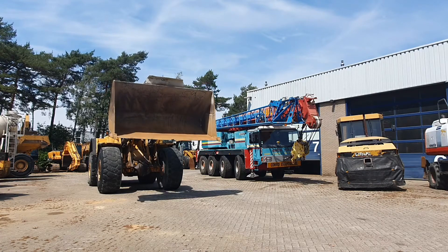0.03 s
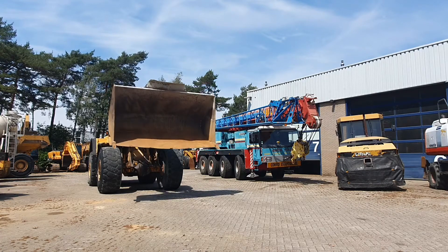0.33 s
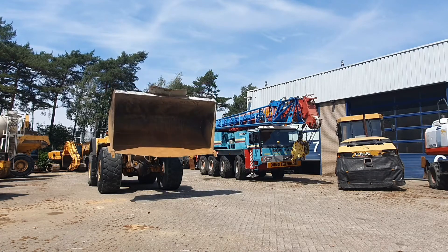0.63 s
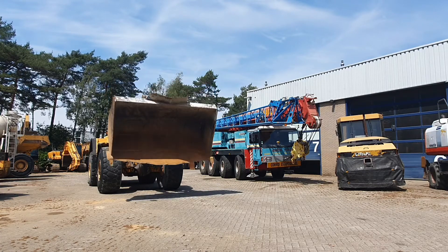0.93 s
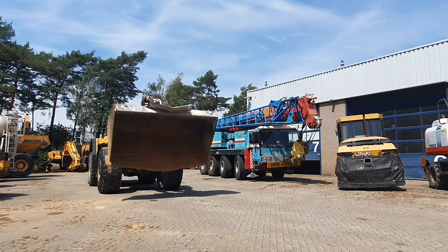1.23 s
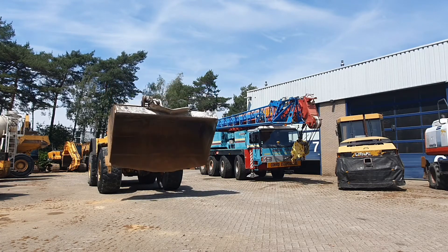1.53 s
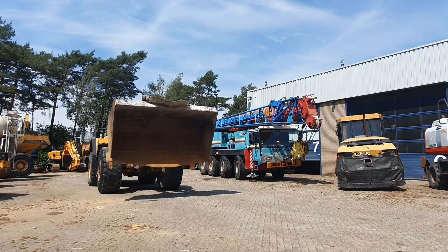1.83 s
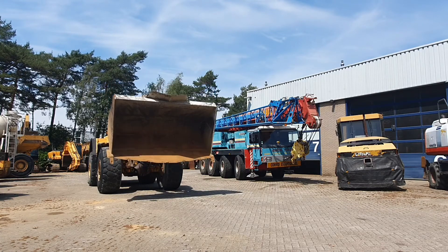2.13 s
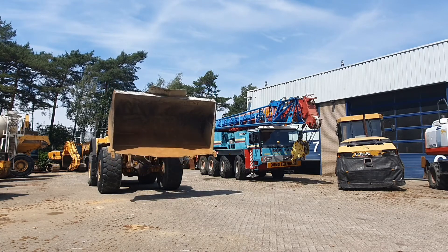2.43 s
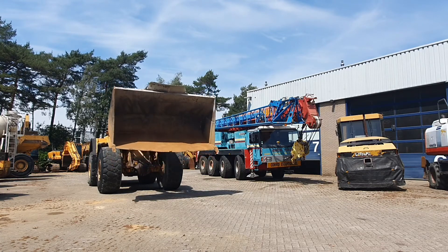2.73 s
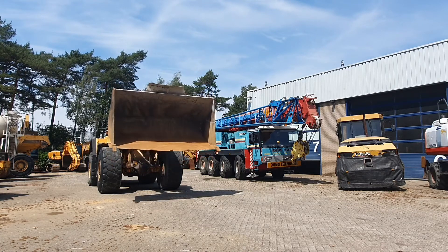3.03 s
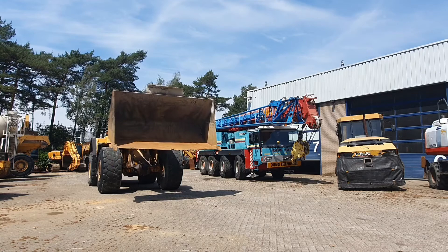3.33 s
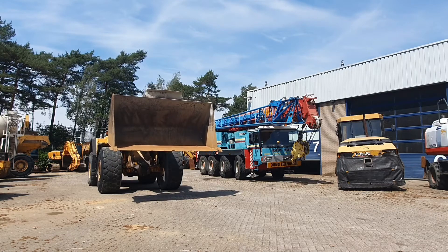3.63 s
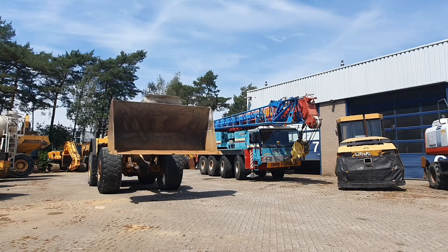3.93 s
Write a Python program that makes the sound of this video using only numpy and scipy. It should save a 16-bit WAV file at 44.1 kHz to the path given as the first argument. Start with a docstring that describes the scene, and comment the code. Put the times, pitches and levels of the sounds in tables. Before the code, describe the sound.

A wheel loader works its bucket outdoors over its droning diesel, a little left of the microphone. A soft hiss ends in three main steel clanks and low thuds, followed by a rasping whine and brighter hiss during the lift.

```python
"""A wheel loader works its bucket

A diesel idles in a paved yard, a little to the left: its firings give a harmonic drone and a clatter.
Turbulent oil hisses in the valve as the bucket sinks. The arms stop short; three main impacts on the
pins, among lighter ones, ring the bucket's plates, and the machine booms as it rocks. Then the pump
whines and rasps under load, and the valve hisses more brightly as the bucket rises again."""
import sys
import numpy as np
from scipy import signal
from scipy.fft import rfft, irfft, next_fast_len
from scipy.io import wavfile
from scipy.ndimage import uniform_filter1d, minimum_filter1d, map_coordinates

SR = 44100
rng = np.random.default_rng(int(sys.argv[2]) if len(sys.argv) > 2 else 0)


def waveform_to_disk(signal):
    """Save audio, clipped to [-1, 1], as 16-bit WAV at the path in sys.argv[1]."""
    frames = np.transpose(np.atleast_2d(signal))
    scaled = np.clip(frames, -1, 1) * 32767
    samples = np.round(scaled).astype(np.int16)
    wavfile.write(sys.argv[1], SR, samples)


N = 176400

# Engine speed. Each row: time in seconds, firing rate in Hz.
FIRING_RATE = [(0, 56.03), (.5, 56.02), (1.25, 55.44), (1.6, 56.4), (1.95, 55.83), (2.3, 55.14),
               (2.65, 55.1), (2.93, 55.7), (3.3, 55.37), (3.6, 55.7), (4, 55.75)]
# Line spectra of exhaust and pump. Each row: multiple of the firing rate, relative level in dB.
EXHAUST_PARTIALS = [(.5, -28.5), (1, 0), (1.5, -33), (2, -8.5), (3, -21.5), (4, -22.5), (5, -35),
                    (6, -22.5)]
PUMP_PARTIALS = [(9, -0.5), (10, -15), (12, -14.5)]
# Envelopes of the sustained sounds. Each row: time in seconds, level in dB.
DRONE_LEVEL = [(0, -22.5), (.8, -21.5), (1.45, -19), (1.75, -24), (1.98, -30), (2.38, -25), (2.5, -28),
               (2.62, -24), (2.71, -31), (2.82, -22.5), (2.93, -26), (3.1, -22.5), (3.32, -24),
               (3.46, -27.5), (3.56, -21.5), (3.7, -26), (3.85, -22), (4, -25)]
CLATTER_LEVEL = [(0, -32), (1.4, -32), (1.8, -34.5), (2.35, -37.5), (2.7, -37.5), (3, -36.5), (4, -35)]
RUMBLE_LEVEL = [(0, -27.5), (1.35, -33.5), (2.1, -27), (2.4, -29), (2.8, -29.5), (4, -31)]
WHINE_LEVEL = [(0, -44.5), (.6, -40.5), (1.0, -42.5), (1.25, -35), (1.42, -46), (1.9, -34), (2.3, -41),
               (2.5, -37), (3.1, -37.5), (3.4, -44.5), (4, -40)]
LOWERING_LEVEL = [(0, -42), (.3, -40.5), (1.34, -44), (1.40, -38), (1.455, -38.5), (1.51, -46.5),
                  (1.65, -94)]
WHISTLE_LEVEL = [(1.3, -73), (1.44, -50), (1.52, -79), (2.65, -85), (2.78, -49), (3.1, -43), (3.45, -40.5),
                 (4, -43.5)]
SHUDDER_LEVEL = [(1.35, -37.5), (1.5, -30.5), (1.68, -23.5), (1.8, -22.5), (1.95, -24.5), (2.1, -24),
                 (2.25, -27.5), (2.45, -44)]
LIFTING_LEVEL = [(2.6, -88), (2.71, -55.5), (2.77, -48), (2.95, -43.5), (3.35, -41), (3.7, -40.5), (4, -38)]
RASP_LEVEL = [(2.6, -96), (2.8, -45), (2.9, -38.5), (3.36, -38), (3.44, -35.5), (3.56, -35), (3.65, -40),
              (4, -37.5)]
# Continuous spectra of the noises. Each row: frequency in Hz, relative level in dB.
CLATTER_SPECTRUM = [(150, -20), (250, -1.5), (330, -4), (380, -8), (435, 0.5), (475, -6), (560, -7.5),
                    (660, -6), (790, -9), (930, -9.5), (1300, -9.5), (2100, -12.5), (2800, -21),
                    (4500, -26), (7500, -37), (8700, -49), (15000, -47)]
RUMBLE_SPECTRUM = [(15, -13), (30, 4), (42, 12.5), (70, 17.5), (90, 4.5), (125, 6.5), (180, 4.5),
                   (280, -11), (450, -37.5)]
LOWERING_SPECTRUM = [(800, 8.5), (2000, 6.5), (3000, -0.5), (4800, 3), (5800, 5.5), (6600, -3), (7600, -3),
                     (8600, -14), (12000, -9.5), (15500, -16)]
SHUDDER_SPECTRUM = [(35, -29), (55, -2.5), (72, 4), (90, -9), (108, 2.5), (135, 9), (160, -6.5), (250, -10),
                    (350, -47)]
RATTLE_SPECTRUM = [(150, -41.5), (350, -8.5), (530, -3.5), (800, -11.5), (1200, -2.5), (1650, -3),
                   (2200, -9.5), (2850, -9.5), (3500, -26), (5500, -33.5), (7500, -49), (9500, -68.5),
                   (15000, -69.5)]
LIFTING_SPECTRUM = [(1500, -7), (2800, -5.5), (4300, -5), (5900, -2), (7000, -6.5), (7600, -4), (8600, -16),
                    (11000, -11), (15500, -17.5)]
# Resonances of the valve and its pipes. Each row: centre in Hz, width in Hz, relative level in dB.
VALVE_RESONANCES = [(4820, 120, -12), (5620, 115, 0), (5890, 200, -7), (6180, 100, -9), (6620, 150, -9)]
# Impacts on the pins. Each row: start in seconds, level in dB, rattle's 60 dB decay time in seconds,
# rattle's tilt in dB per octave, frequency the contact favours in Hz.
IMPACTS = [(1.512, -27, .14, -5, 1500), (1.545, -29, .14, -10, 1100), (1.604, -12.5, .14, 0, 1650),
           (1.610, -10, .16, -1, 1300), (1.700, -26, .2, -8, 1150), (1.733, -24.5, .17, -7, 1150),
           (1.819, -26, .2, -7, 1100), (1.835, -17.5, .28, -2, 1050), (2.053, -16.5, .3, 1.5, 1550),
           (2.092, -24, .25, -8, 1200)]
# Plate modes. Each row: frequency in Hz, relative level in dB, free 60 dB decay time in seconds.
BUCKET_MODES = [(415, -14, 1.8), (460, -9, .3), (508, -9, .4), (589, -1, .38), (704, -11, .6),
                (1110, -4, .4), (1218, -1, .25), (1422, -2, .32), (1503, 0, .16), (1587, -2, .22),
                (1650, -2, .15), (1722, -4, .2), (1775, -3, .22), (1914, -4, .24), (2480, -10, .28),
                (2730, -8, .22), (2900, -10, .3)]
# Jolts of the machine. Each row: peak time in seconds, level in dB, pitch in Hz, swell time in seconds.
JOLTS = [(1.554, -10.5, 64, 0.013), (1.656, -10, 71.4, 0.049), (1.866, -9, 62.5, 0.039),
         (2.107, -10.5, 67, 0.018), (2.188, -20.5, 60, 0.046), (2.33, -16.5, 63.24, 0.015)]
# Resonance of the loaded pump. Each row: time in seconds, centre in Hz.
RASP_CENTRE = [(2.85, 1808), (3.15, 1900), (3.45, 1860), (3.56, 1677), (3.7, 1843)]
# Likeness of the two channels of noise. Each row: frequency in Hz, correlation coefficient.
COHERENCE = [(50, 0.99), (250, 0.97), (600, 0.73), (1500, 0.28), (4000, 0.37), (8000, 0.45), (15000, 0.22)]
# Position of the drone. Each row: time in seconds, left minus right level in dB.
DRONE_BALANCE = [(0, 0), (2.5, 0), (2.9, -1.8), (3.3, -2.8), (3.65, .4)]
# Position of the whole machine. Each row: frequency in Hz, left minus right level in dB.
MACHINE_BALANCE = [(60, -0.5), (300, -0.5), (1000, 0), (2200, 1.5), (4500, 0.5), (8000, 3), (15000, -2.5)]
# Reverberation of the yard. Each row: frequency in Hz, 60 dB decay time in seconds.
YARD_DECAY = [(200, 1), (1500, 0.2), (4000, 0.2), (10000, 0.13)]

TIME = np.arange(N) / SR
SIDES = np.array([[.5], [-.5]])  # splits a difference between left and right


def amp(db):
    """Amplitude ratio of a level in decibels."""
    return 10 ** (np.asarray(db) / 20)


def unit(x):
    """Normalisation to rms 1."""
    return x / np.sqrt(np.mean(x ** 2) + 1e-20)


def along(points, hz):
    """Interpolation of (Hz, value) points on a logarithmic frequency axis."""
    f, v = np.transpose(points)
    return np.interp(np.log(hz + 1), np.log(f + 1), v)


def curve(rows):
    """Linear interpolation of (seconds, value) rows at every sample."""
    return np.interp(TIME, *np.transpose(rows))


def wobble(rate):
    """Smooth random fluctuation: a spline through `rate` knots a second."""
    coarse = np.arange(0, N + 64, 64)
    spline = map_coordinates(rng.standard_normal(512), [coarse * rate / SR], mode="wrap")
    return np.interp(np.arange(N), coarse, spline)


def filtered(x, response):
    """Linear filtering: the spectrum is multiplied by a frequency response."""
    size = next_fast_len(N + SR // 2)
    return irfft(rfft(x, size) * response(np.fft.rfftfreq(size, 1 / SR)), size)[..., :N]


def noise(spectrum, tilt_db=0):
    """Partly coherent stereo noise of rms 1, nearly mono in the bass."""
    def response(hz):
        spread = np.arccos(np.clip(along(COHERENCE, hz), -1, 1)) / 2
        db = along(spectrum, hz) + tilt_db * np.log2(np.maximum(hz / 1000, .5))
        rolloff = np.maximum(hz / spectrum[-1][0], 1) ** 5
        return amp(db) / rolloff * [np.cos(spread), np.sin(spread)]
    mid, side = filtered(rng.standard_normal((2, N)), response)
    return unit(np.array([mid + side, mid - side]))


def tones(phase, partials, waver_db, rate):
    """Fourier synthesis: partials locked to the firing phase, each wavering in level."""
    return -np.sqrt(2) * sum(amp(db + waver_db * wobble(rate)) * np.cos(k * phase) for k, db in partials)


def exhaust_drone(phase):
    """Periodic firing pulses give a line spectrum on the firing rate."""
    level_db = curve(DRONE_LEVEL) + curve(DRONE_BALANCE) * SIDES
    return amp(level_db) * tones(phase, EXHAUST_PARTIALS, waver_db=-.1, rate=49)


def engine_knock(phase):
    """Valves and injectors tick alike in each cycle of four firings; the long period gives close lines."""
    cycle = rng.standard_normal(3000)
    position = phase / (8 * np.pi) % 1 * len(cycle)
    ticks = map_coordinates(cycle, [position], order=1, mode="wrap")
    return unit(filtered(ticks, lambda hz: amp(along(CLATTER_SPECTRUM, hz)) / (1 + (hz / 1800) ** 4)))


def engine_clatter(phase, firing_depth=.06, knock_db=-8.5):
    """Noise, amplitude-modulated by the firings, adds to the periodic knock."""
    pulsing = noise(CLATTER_SPECTRUM) * (1 + firing_depth * np.cos(phase))
    return amp(curve(CLATTER_LEVEL)) * unit(pulsing + amp(knock_db) * engine_knock(phase))


def chassis_rumble():
    """Random vibration of the chassis radiates low-frequency noise."""
    return amp(curve(RUMBLE_LEVEL)) * noise(RUMBLE_SPECTRUM)


def pump_whine(phase):
    """The pump turns with the engine, so its tones are high harmonics of the firing rate."""
    return amp(curve(WHINE_LEVEL)) * tones(phase, PUMP_PARTIALS, waver_db=2.4, rate=19)


def valve_hiss(level, spectrum):
    """Turbulent oil in the valve radiates broadband noise while the arms move."""
    return amp(curve(level)) * noise(spectrum)


def valve_whistle():
    """Oil flow excites narrow resonances as the valve closes and during the lift."""
    def response(hz):
        return sum(amp(db) / (1 + (2 * (hz - centre) / width) ** 2)
                   for centre, width, db in VALVE_RESONANCES)
    envelope = amp(curve(WHISTLE_LEVEL) + wobble(5.5))
    return envelope * unit(filtered(rng.standard_normal((2, N)), response))


def frame_shudder():
    """The sudden stop excites low bands of random vibration in the frame."""
    return amp(curve(SHUDDER_LEVEL)) * noise(SHUDDER_SPECTRUM)


def plate_ring(age, contact_hz, decay_s, contact_db=4, contact_octaves=.3, free_decay_s=.22):
    """Damped modes: boosted near the contact's pitch, shorter when pressed tight, wavering on shifting."""
    ring = np.zeros(N)
    for hz, db, t60 in BUCKET_MODES:
        favoured_db = contact_db * np.exp(-(np.log2(hz / contact_hz) / contact_octaves) ** 2)
        fade_db = -60 * age / (t60 * decay_s / free_decay_s)
        turns = hz * age + rng.random() + .08 * wobble(30)
        waver_db = 2.2 * wobble(30)
        ring += amp(db + favoured_db + fade_db + waver_db) * np.sin(2 * np.pi * turns)
    return ring


def bucket_clanks(attack_s=.005, ring_db=-9, rattle_db=1):
    """Impact excitation: each knock on the pins rings the plates and sets off a dense steel rattle."""
    out = np.zeros((2, N))
    for start, db, decay_s, tilt_db, contact_hz in IMPACTS:
        age = np.maximum(TIME - start, 0)
        attack = 1 - np.exp(-age / attack_s)
        rattle = noise(RATTLE_SPECTRUM, tilt_db) * amp(rattle_db - 60 * age / decay_s)
        ring = amp(ring_db) * plate_ring(age, contact_hz, decay_s)
        out += amp(db) * attack * (ring + rattle)
    return out


def rocking_booms():
    """Each jolt of the rocking machine radiates a wave packet: deep cycles in a Gaussian envelope."""
    out = np.zeros(N)
    for peak_s, db, hz, swell_s in JOLTS:
        t = TIME - peak_s
        out += amp(db) * np.sqrt(2) * np.exp(-(t / swell_s) ** 2) * np.cos(2 * np.pi * hz * t)
    return out


def pump_rasp(width_hz=640):
    """Noise in one broad resonance of the loaded pump, whose centre sags as the load peaks."""
    source = rng.standard_normal((2, N)) + rng.standard_normal(N)
    band = filtered(source, lambda hz: 1 / (1 + (2 * hz / width_hz) ** 2) / (1 + (hz / 900) ** 4))
    carrier = np.cos(2 * np.pi * np.cumsum(curve(RASP_CENTRE)) / SR)  # shifts the band up to the centre
    return amp(curve(RASP_LEVEL) + wobble(20)) * unit(band * carrier)


def yard_echo(x):
    """Scattering from sheds and parked machines: convolution with exponentially decaying noise."""
    hz, t, spectra = signal.stft(rng.standard_normal((2, SR // 2)), SR, nperseg=256)
    decay = amp(-60 * t / along(YARD_DECAY, hz)[:, None])
    tail = signal.istft(spectra * decay, SR, nperseg=256)[1]
    return signal.fftconvolve(x, tail / np.linalg.norm(tail[0]), axes=1)[:, :N]


def scene(speed_jitter=.0053, left_lead_s=.00012, echo_db=-21):
    """Superposition of the sources, placed by time and level differences; only the clanks echo."""
    firing_hz = curve(FIRING_RATE) * (1 + speed_jitter * wobble(20))
    phase = 2 * np.pi * np.cumsum(firing_hz) / SR
    clanks = bucket_clanks()
    engine = exhaust_drone(phase) + engine_clatter(phase) + chassis_rumble()
    hydraulics = pump_whine(phase) + valve_hiss(LOWERING_LEVEL, LOWERING_SPECTRUM)
    hydraulics += valve_hiss(LIFTING_LEVEL, LIFTING_SPECTRUM) + valve_whistle() + pump_rasp()
    machine = engine + hydraulics + frame_shudder() + clanks + rocking_booms()

    def placement(hz):
        return amp(SIDES * along(MACHINE_BALANCE, hz)) * np.exp(2j * np.pi * hz * SIDES * left_lead_s)
    return filtered(machine, placement) + amp(echo_db) * yard_echo(clanks)


def record(dry, ceiling=.93, limiter_s=.006, top_hz=15400):
    """Peak limiting by a smoothed gain, followed by a sharp band limit."""
    width = int(limiter_s * SR)
    needed = ceiling / np.maximum(np.abs(dry).max(axis=0), ceiling)
    gain = uniform_filter1d(minimum_filter1d(needed, 2 * width), width)
    return filtered(dry * gain, lambda hz: hz < top_hz)


dry = scene()
out = record(dry)
waveform_to_disk(out)
```